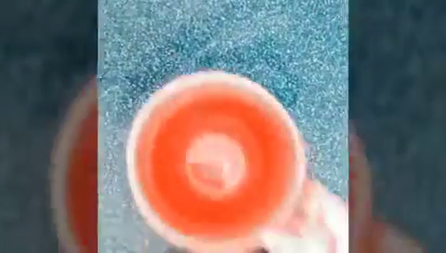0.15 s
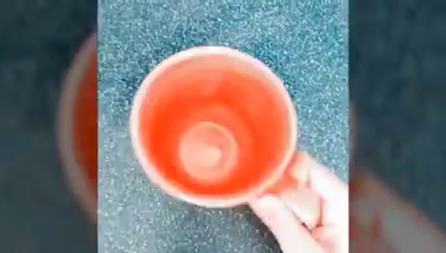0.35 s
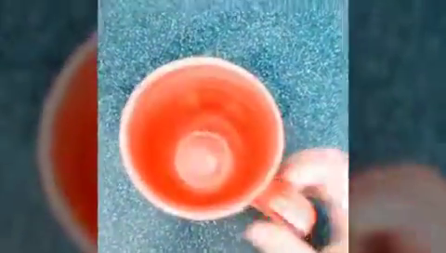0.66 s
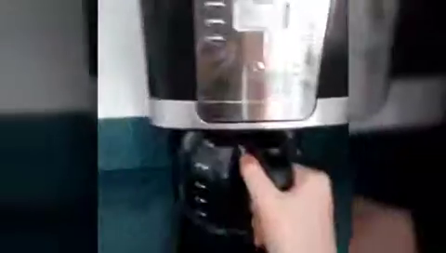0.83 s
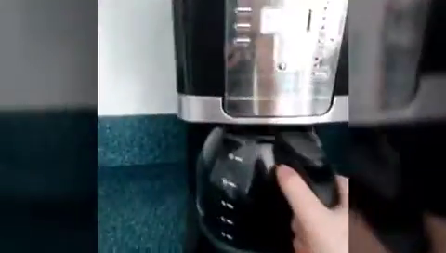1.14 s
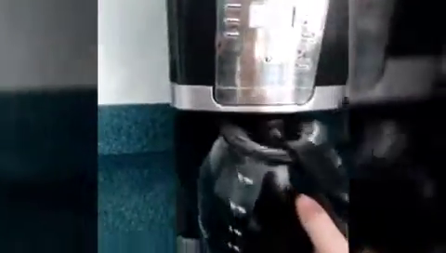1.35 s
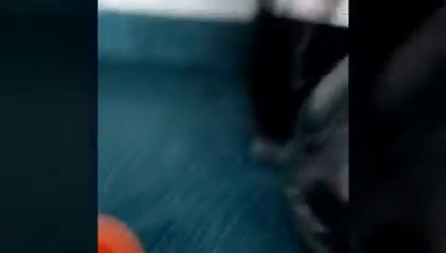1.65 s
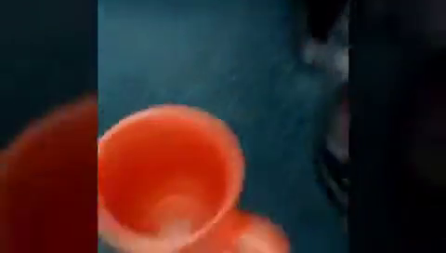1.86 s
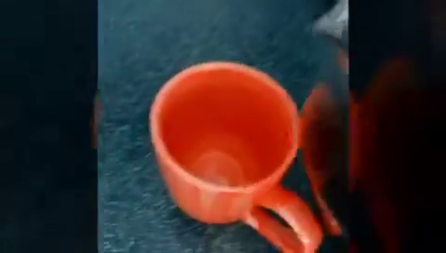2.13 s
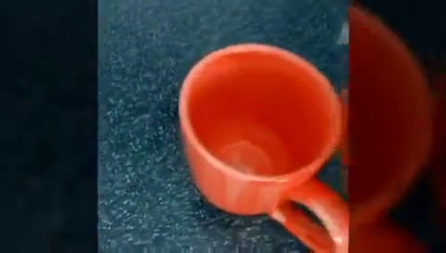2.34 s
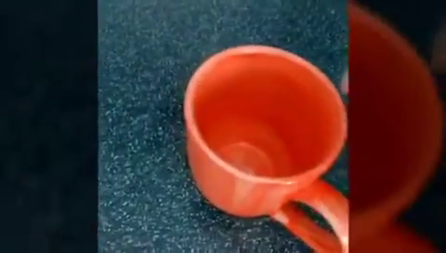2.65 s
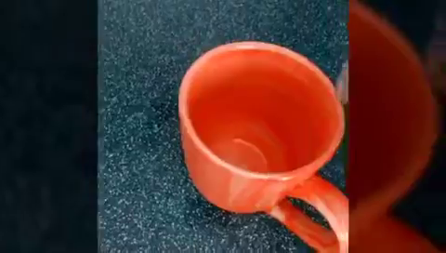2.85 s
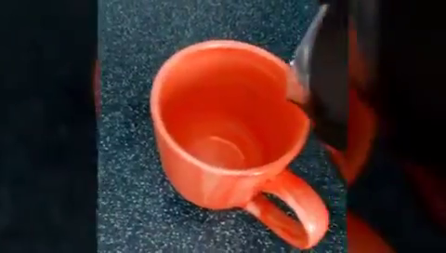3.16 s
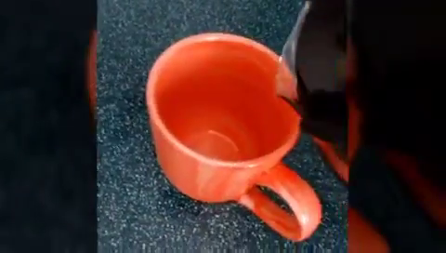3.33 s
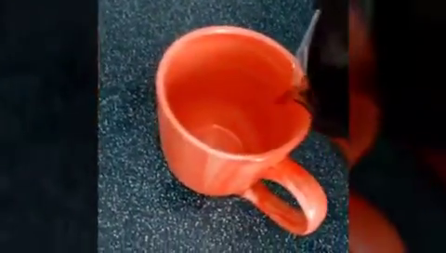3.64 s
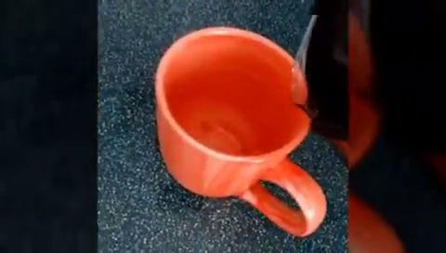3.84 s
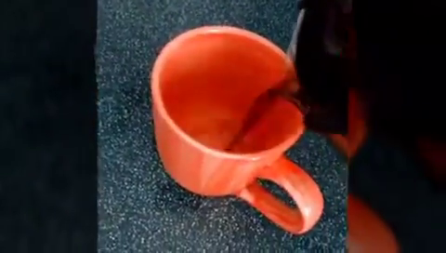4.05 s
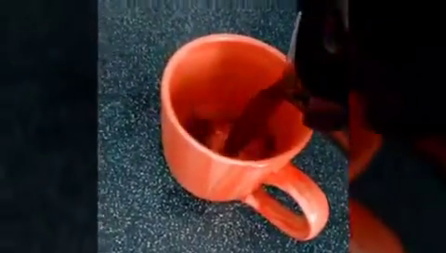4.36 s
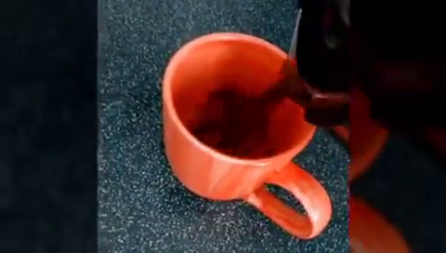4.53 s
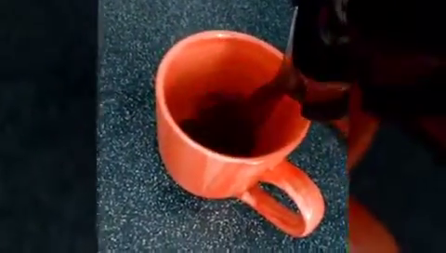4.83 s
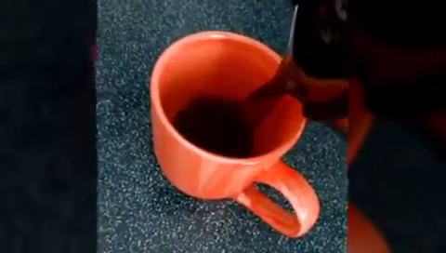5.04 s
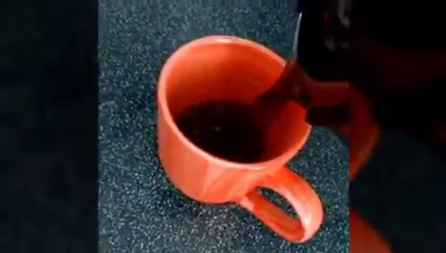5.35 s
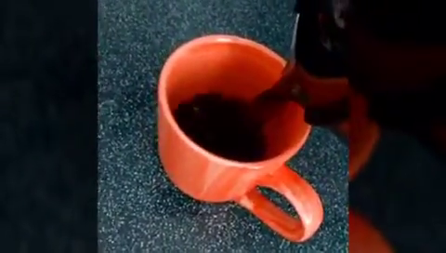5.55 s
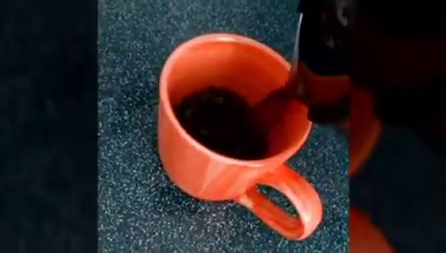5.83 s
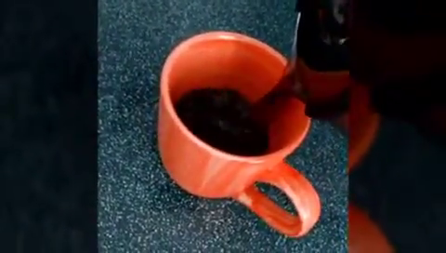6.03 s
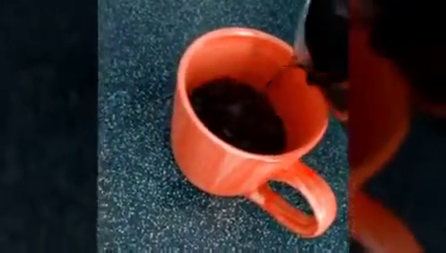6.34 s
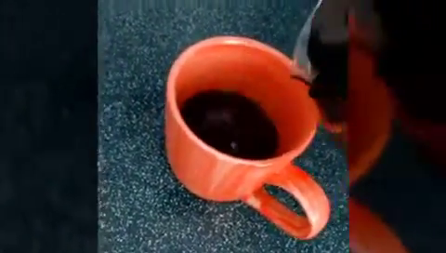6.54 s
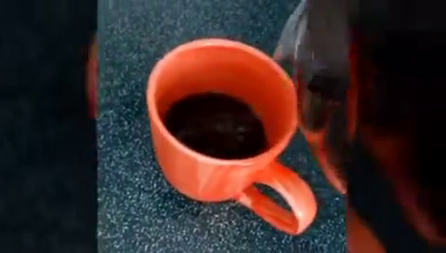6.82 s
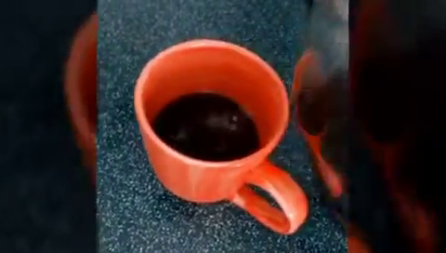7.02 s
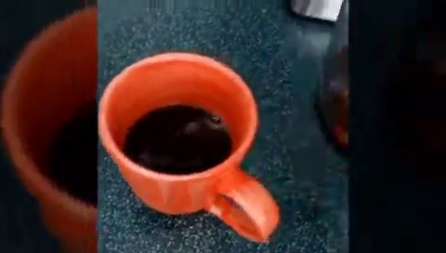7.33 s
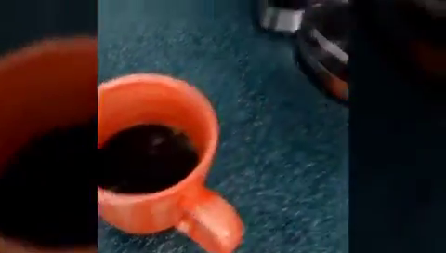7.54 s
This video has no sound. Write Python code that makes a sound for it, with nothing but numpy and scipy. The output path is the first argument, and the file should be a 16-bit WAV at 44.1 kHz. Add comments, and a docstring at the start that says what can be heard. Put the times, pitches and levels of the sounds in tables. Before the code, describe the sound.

A ceramic mug knocks hard onto a counter, a glass carafe rattles out and clinks down, then coffee trickles and bubbles into the mug.

```python
"""Over appliance rumble and hiss, a ceramic mug is set down on a counter; a glass carafe squeaks and rattles
as it is dragged out of its machine, clinks and clacks down, and touches and taps the mug with its spout.
Coffee then trickles and bubbles into the mug and the carafe lid clacks. Solid bodies sound as decaying modes
over coloured noise, rubbing as uneven partials, liquid as rising bubble tones and jolted resonances. A small
hard room returns echoes of the blows and the pour; a close phone microphone limits the band.
"""
import sys
import numpy as np
from scipy import signal
from scipy.fft import rfft, irfft
from scipy.io import wavfile
from scipy.ndimage import uniform_filter1d

SR = 44100
rng = np.random.default_rng(int(sys.argv[2]) if len(sys.argv) > 2 else 0)


def to_wav(s):
    """Save 16-bit WAV."""
    ch = np.atleast_2d(s).T  # columns
    pcm = np.round(np.clip(ch, -1, 1) * 32767)  # PCM
    wavfile.write(sys.argv[1], SR, pcm.astype(np.int16))


N = 338688  # samples


def gain_of(db):
    """Level law: decibels to amplitude ratio."""
    return 10 ** (np.asarray(db) / 20)


def evened(x):
    """Power normalization: scales a signal to rms 1."""
    return x / np.sqrt(np.mean(x ** 2) + 1e-20)


def read(points, hz):
    """Logarithmic pitch scale: interpolates (frequency [Hz], value) rows along log frequency."""
    f, value = np.transpose(points)
    return np.interp(np.log(hz + 1), np.log(f + 1), value)


def track(t, s, db):
    """Piecewise-linear level in dB over time, returned as gain; -120 dB outside the given times."""
    return gain_of(np.interp(t, s, db, -120, -120))


def add(mix, s, sound):
    """Superposition: adds a sound into the mix at a time in seconds."""
    part = mix[round(s * SR):][:len(sound)]
    part += sound[:len(part)]


def band(x, lo_hz, hi_hz):
    """Band-pass filtering: isolates one frequency range."""
    return signal.sosfilt(signal.butter(2, [lo_hz, hi_hz], "bandpass", fs=SR, output="sos"), x)


def noise(colour, count):
    """Spectral shaping: white noise weighted by a colour curve, at rms 1."""
    spectrum = rfft(rng.standard_normal(count))
    hz = np.fft.rfftfreq(count, 1 / SR)
    return evened(irfft(spectrum * gain_of(read(colour, hz)), count))


def blows(rows, modes, colour, clatter_t60, rise_ms, spread_db, chatter_db):
    """Modal impact: a blow excites decaying modes and a noise clatter; its hardness tilts the spectrum."""
    out, t = np.zeros(N), np.arange(SR) / SR
    hz, db, t60 = np.transpose(modes)[:, :, None]
    bands = ((40, 500), (500, 2500), (3500, 11000))  # thud, knock, tick [Hz]
    band_centres = (300, 1400, 5500)  # Hz
    decay = gain_of(-60 * t / clatter_t60)
    onset = np.minimum(t * 1000 / rise_ms, 1)
    for s, knock_db, thud_db, tick_db, ring_db in rows:
        uneven_db = spread_db * rng.standard_normal(hz.shape)
        rings = gain_of(db + uneven_db - 60 * t / t60) * np.sin(2 * np.pi * hz * t)
        chatter = uniform_filter1d(rng.standard_normal(rings.shape), size=600) * np.sqrt(600)
        rings *= gain_of(chatter_db * chatter)  # loose contact makes each mode swell and sag
        rings *= gain_of(ring_db) / abs(rings.sum(0)).max()
        clatter = noise(colour, len(t)) / 3
        plain = (rings.sum(0) + clatter * decay) * onset
        # tilt the colour by what each band lacks against its target level
        band_rms = [np.sqrt(uniform_filter1d(band(plain[:9000], *b) ** 2, size=300).max()) for b in bands]
        tilt_db = np.array([thud_db, knock_db, tick_db]) - 20 * np.log10(band_rms)
        tilt = list(zip(band_centres, tilt_db))
        clatter = irfft(rfft(clatter) * gain_of(read(tilt, np.arange(SR // 2 + 1))), SR)
        rings = (rings * gain_of(read(tilt, hz))).sum(0)
        add(out, s, (rings + clatter * decay) * onset)
    return out


# Appliance rumble and hiss: (frequency [Hz], level per hertz [dB])
RUMBLE_COLOUR = [(15, -40.5), (25, -23.5), (48, 2), (80, -5), (114, -5.5), (171, -10.5), (298, -11.5),
                 (374, -12.5), (560, -20.5), (797, -20.5), (952, -25.5), (1390, -28), (1750, -30.5),
                 (4340, -38), (10500, -46), (13600, -83.5), (22000, -120)]
RUMBLE_DB = -51.5  # rms level before the treble is lifted
# Spans of stronger hiss: (start [s], end [s], added treble level [dB])
HISS_SWELLS = [(0.52, 0.93, 6), (2.27, 2.835, 9.5), (3.455, 3.7, 2)]
# Hiss climbing once the coffee flows: (time [s], added treble level [dB])
HISS_CLIMB = [(4.8, -3), (6.3, 7), (7.68, 8)]


def background():
    """Stationary noise: rumble and hiss of fixed colour, the treble above 1500 Hz varying in level."""
    t, rumble = np.arange(N) / SR, noise(RUMBLE_COLOUR, N)
    treble = signal.sosfilt(signal.butter(2, 1500, "highpass", fs=SR, output="sos"), rumble)
    lift_db = np.interp(t, *np.transpose(HISS_CLIMB))
    lift_db += sum(db * (start < t) * (t < end) for start, end, db in HISS_SWELLS)
    return gain_of(RUMBLE_DB) * (rumble + (gain_of(lift_db) - 1) * treble)


# In every table of blows: knock is 500-2500 Hz, thud below 500 Hz, tick above 3500 Hz,
# and ring is the level of the modes against the clatter.
# Mug on counter: (time [s], knock [dB], thud [dB], tick [dB], ring [dB])
MUG_BLOWS = [(0.514, -5.5, -16.5, -31, -12.5), (0.728, -8.5, -17.5, -31, -12.5),
             (0.793, -12.5, -21, -38.5, -10.5)]
# Modes of the ceramic mug: (frequency [Hz], level [dB], t60 [s])
MUG_MODES = [(98.8, 5, 0.27), (186, 3, 0.19), (290.2, -0.5, 0.29), (390, -2.5, 0.3), (530, -12.5, 0.19),
             (781, -8, 0.17), (1050, -12, 0.12), (1330, -14, 0.033), (1803, -17, 0.12),
             (2403, -17.5, 0.051)]
# Unpitched clatter of the mug: (frequency [Hz], level per hertz [dB])
MUG_CLATTER = [(29, -40.5), (50, -1.5), (332, 0.5), (680, -10), (764, -6.5), (919, -14), (2480, -24),
               (10200, -73), (12500, -82.5), (16200, -118), (22000, -120)]


def mug_set_down():
    """Modal impact of a ceramic shell: low modes outlast a short clatter."""
    return blows(MUG_BLOWS, MUG_MODES, MUG_CLATTER,
                 clatter_t60=0.099, rise_ms=0.43, spread_db=3.0, chatter_db=2.5)


# Reverberation of the small hard room: (frequency [Hz], t60 [s])
ROOM_DECAY = [(100, 0.46), (500, 0.82), (2000, 0.83), (5000, 0.72), (10000, 0.49)]


def kitchen(x):
    """Sparse reflections: one tap of random sign per 20 samples, each band decaying at its own rate."""
    taps = np.zeros(SR)
    starts = np.arange(300, SR - 20, 20)
    taps[starts + rng.integers(0, 20, len(starts))] = rng.choice([-1., 1.], len(starts))
    hz, t, z = signal.stft(taps, SR, nperseg=256)
    decay = gain_of(-60 * t / read(ROOM_DECAY, hz)[:, None])
    tail = signal.istft(z * decay, SR, nperseg=256)[1]
    return signal.fftconvolve(x, tail / np.linalg.norm(tail))[:N]


# Glass rubbing on the hot plate: (time [s], length [s], level [dB])
SQUEAKS = [(0.868, 0.06, -67.5), (1.191, 0.03, -59)]
# Partials of the squeak: (frequency [Hz], level [dB])
SQUEAK_PARTIALS = [(4700, -3), (5900, -9), (6550, -7), (8600, -1)]


def squeaks():
    """Stick-slip friction: rubbing sounds a few high partials under an uneven grip."""
    out = np.zeros(N)
    for s, length, db in SQUEAKS:
        t = np.arange(0, length, 1 / SR)
        grip = 1 + .5 * evened(uniform_filter1d(rng.standard_normal(len(t)), size=200))
        tone = sum(gain_of(d) * np.sin(2 * np.pi * hz * t) for hz, d in SQUEAK_PARTIALS)
        add(out, s, gain_of(db) * grip * tone * signal.windows.tukey(len(t), .4))
    return out


# Sudden drops of the ringing and echoes: (start [s], end [s], gain [dB])
RING_DROPS = [(1.015, 1.146, -31), (2.825, 3.3, -3)]


def drop_rings(x):
    """Gated attenuation: the sounds and their echoes are abruptly weaker within each span."""
    for start, end, db in RING_DROPS:
        x[round(start * SR):round(end * SR)] *= gain_of(db)
    return x


# Carafe dragged out of the machine: (time [s], knock [dB], thud [dB], tick [dB], ring [dB])
MACHINE_BLOWS = [(1.215, -44, -40, -56, -1), (1.244, -42, -34.5, -41.5, -6),
                 (1.267, -26.5, -33.5, -45, -4.5), (1.289, -28, -25, -47.5, -27),
                 (1.314, -18.5, -21, -34.5, -5.5), (1.34, -21, -22, -29.5, -1.5),
                 (1.403, -29.5, -36.5, -49, -8.5), (1.426, -25, -36, -37, -10),
                 (1.443, -20.5, -30.5, -57, -6.5), (1.489, -35, -40.5, -50, -1.5),
                 (1.594, -27.5, -26, -37.5, -13.5), (1.614, -31.5, -23, -36.5, -5),
                 (1.7, -34, -19.5, -29.5, -8.5), (1.71, -23.5, -25, -38.5, 9)]
# Modes of the machine: (frequency [Hz], level [dB], t60 [s])
MACHINE_MODES = [(61, -8, .25), (102, -1, .23), (320, -4, .13), (705, -17, .08), (1303, -15, .09),
                 (1550, -24, .25), (1938, -21, .2), (2078, -17, .14), (2492, -25, .15), (2606, -19, .2),
                 (3138, -32, .2), (3822, -33, .15), (3984, -25, .3), (4700, -30, .1), (5900, -32, .08),
                 (6400, -29, .1)]
# Unpitched clatter of the machine: (frequency [Hz], level per hertz [dB])
MACHINE_CLATTER = [(29, -38.5), (50, -7), (102, -9), (162, -14.5), (325, 5.5), (429, -9.5), (1800, -27),
                   (2060, -22), (8250, -35), (12500, -43), (16200, -54), (22000, -120)]


def machine_rattle():
    """Repeated modal impact: a run of blows excites the modes of the machine, with strong chatter."""
    return blows(MACHINE_BLOWS, MACHINE_MODES, MACHINE_CLATTER,
                 clatter_t60=0.12, rise_ms=0.73, spread_db=3.5, chatter_db=5.5)


# Carafe clinking down: (time [s], knock [dB], thud [dB], tick [dB], ring [dB])
GLASS_BLOWS = [(2.314, -8.5, -14.5, -12.5, 2.5), (2.412, -19, -17.5, -17.5, -4.5)]
# Modes of the glass carafe: (frequency [Hz], level [dB], t60 [s])
GLASS_MODES = [(162, -19, .25), (226, -14, .17), (322, -9, .12), (748, -13, .1), (969, -20, .2),
               (1488, 0, .2), (1550, -11, .3), (1997, -7, .55), (2142, -10, .45), (2317, -2, .27),
               (2477, -6, .14), (2861, -13, .45), (3500, -18, .25), (3826, -10, .33), (4385, -10, .2),
               (4870, -4, .14), (5893, -6, .11), (6030, -21, .45), (6514, -22, .18), (6700, -19, .12),
               (7300, -10, .05), (8495, -7, .1), (9190, -20, .1), (9990, -22, .1)]
# Unpitched clatter of the glass: (frequency [Hz], level per hertz [dB])
GLASS_CLATTER = [(40, -23), (310, -10), (1100, -13.5), (2300, -9.5), (4200, -22), (6500, -12), (7900, -28),
                 (9500, -19), (12500, -40.5), (16000, -72)]


def glass_clinks():
    """Modal impact of a glass shell: many bright modes, strongest in the kilohertz range."""
    return blows(GLASS_BLOWS, GLASS_MODES, GLASS_CLATTER,
                 clatter_t60=0.11, rise_ms=1.0, spread_db=0.85, chatter_db=4.0)


# Dull clacks of the carafe and its lid: the carafe body set down, later the lid:
# (time [s], knock [dB], thud [dB], tick [dB], ring [dB])
CLACK_BLOWS = [(2.48, -24, -15.5, -34.5, 0.5), (6.657, -15.5, -16, -21, 0.5), (6.742, -37, -68, -45, -3),
               (6.905, -45.5, -36.5, -58, 1), (7.03, -34.5, -29.5, -55.5, 1)]
# Modes of the clacks: (frequency [Hz], level [dB], t60 [s])
CLACK_MODES = [(96, -20, .18), (160, -22, .12), (220, -13, .1), (323, 0, .11), (1120, -12, .045),
               (1580, -14, .055), (1900, -22, .05), (2100, -19, .09), (2370, -18, .07), (3170, -26, .05),
               (3314, -24, .045), (3690, -17, .05), (5600, -30, .03)]
# Unpitched clatter of the clacks: (frequency [Hz], level per hertz [dB])
CLACK_CLATTER = [(40, -20), (100, -7), (320, 4), (560, -20.5), (900, -10), (2300, -17), (4200, -29),
                 (9500, -27.5), (12500, -82), (16000, -93)]


def carafe_and_lid_clacks():
    """Heavily damped modal impact: short modes make a dull clack of the carafe body, later of the lid."""
    return blows(CLACK_BLOWS, CLACK_MODES, CLACK_CLATTER,
                 clatter_t60=0.064, rise_ms=1.24, spread_db=-2.5, chatter_db=3.0)


# Spout meeting the mug: (time [s], knock [dB], thud [dB], tick [dB], ring [dB])
RIM_TOUCH = [(3.457, -58, -74, -63.5, 6.4)]
# Modes of that touch: (frequency [Hz], level [dB], t60 [s])
RIM_MODES = [(1550, 7, 0.63), (4570, -11, 0.18), (6169, -16, .2)]


def rim_touch():
    """Lightly damped modal impact: a soft touch leaves one long mode ringing above two weaker ones."""
    return blows(RIM_TOUCH, RIM_MODES, GLASS_CLATTER,
                 clatter_t60=.15, rise_ms=3, spread_db=.6, chatter_db=4)


# Spout knocking the mug: (time [s], knock [dB], thud [dB], tick [dB], ring [dB])
SPOUT_TAPS = [(3.721, -33, -27.5, -47.5, 6.6), (4.327, -47, -67, -62, 3.3)]
# Modes of those knocks: (frequency [Hz], level [dB], t60 [s])
SPOUT_MODES = [(320, 0, .09), (880, -20, .04), (1290, -29, .07), (1900, -18, .06), (2350, -11, .055),
               (3700, -20, .04), (5600, -28, .05), (6050, -30, .05)]


def spout_taps():
    """Damped modal impact with a slow onset: the spout taps the mug with short modes."""
    return blows(SPOUT_TAPS, SPOUT_MODES, CLACK_CLATTER,
                 clatter_t60=0.082, rise_ms=3.4, spread_db=-2.4, chatter_db=5.0)


def bubble(hz, cycles, rise):
    """Bubble resonance: a pocket of air rings briefly, its pitch climbing as it nears the surface."""
    turns = np.arange(0, 4 * cycles, hz / SR)  # periods of the starting pitch
    swell = np.exp(-2 * turns / cycles) * np.minimum(turns / 2.5, 1)
    return np.sin(2 * np.pi * turns * (1 + rise * turns / cycles)) * swell


def clusters(rows, cycles, rise, scatter, spread_s, count=4):
    """Air entrainment: each plunge frees one main bubble, then a few weaker ones of nearby size."""
    out = np.zeros(N)
    for (s, db, hz), chance in zip(rows, rng.random((len(rows), count, 3))):
        add(out, s, gain_of(db) * bubble(hz, cycles, rise))
        for late, size, weak in chance:
            near_hz = hz * np.exp(scatter * (2 * size - 1))
            add(out, s + spread_s * late, gain_of(db - 4.0 - 6.8 * weak) * bubble(near_hz, cycles, rise))
    return out


def swarm(lo_hz, hi_hz, per_s, cycles, spread_db, clump_db, count=24):
    """Random superposition: bubbles of many sizes arrive in clumps, a few much louder; rms 1."""
    clumps = gain_of(clump_db * evened(uniform_filter1d(rng.standard_normal(N), size=500)))
    loudness = gain_of(spread_db * np.minimum(rng.exponential(1, N), 4))
    hits = loudness * (rng.random(N) < clumps * per_s / SR)
    kind = rng.integers(0, count, N)
    total = np.zeros(N)
    for k, hz in enumerate(np.geomspace(lo_hz, hi_hz, count)):
        total += signal.oaconvolve(hits * (kind == k), bubble(hz, cycles, 0.045))[:N]
    return evened(total)


def jolted(rows, width_hz, jolts_per_s):
    """Driven resonance: a resonator of moving pitch rings at each of many random jolts."""
    s, hz, db = np.transpose(rows)
    t = np.arange(N) / SR
    turn = np.exp(2j * np.pi * np.cumsum(np.interp(t, s, hz)) / SR)
    r = np.exp(-np.pi * width_hz / SR)  # decay per sample
    strength = gain_of(4.1 * np.minimum(rng.exponential(1, N), 4))
    jolts = strength * (rng.random(N) < jolts_per_s / SR)
    ring = (turn * signal.lfilter([1], [1, -r], jolts / turn + 1e-18)).real
    return track(t, s, db) * evened(ring)


# The stream of coffee: (time [s], gurgle level [dB], fizz level [dB])
STREAM = [(4.45, -91, -70), (4.56, -63.5, -62), (4.74, -78.5, -90), (4.76, -48, -52.5), (4.92, -66, -54.5),
          (5.0, -53.5, -55), (5.12, -51, -52.5), (5.17, -59, -75), (5.3, -54.5, -54.5),
          (5.39, -63.5, -66.5), (5.49, -54.5, -62.5), (5.7, -58, -62.5), (6.2, -66, -62), (6.3, -63.5, -80),
          (6.6, -73, -64)]
# Large bubbles: (time [s], level [dB], starting pitch [Hz])
BUBBLES = [(4.482, -46, 4370), (4.534, -43.5, 2480), (4.573, -35, 2760), (4.758, -38, 1024),
           (4.798, -24, 2400), (4.856, -32, 3720), (4.949, -32, 2980), (4.987, -30, 1210),
           (4.997, -27, 1653), (5.128, -30.5, 1450), (5.172, -39, 3940), (5.201, -36, 1780),
           (5.222, -39, 1260), (5.278, -30, 2800), (5.331, -38, 2700), (5.421, -39, 2680),
           (5.48, -29.5, 4130), (5.487, -35, 1300), (5.499, -25, 3080), (5.534, -28.5, 3630),
           (5.655, -39, 954), (5.688, -36.5, 923), (5.78, -25.5, 3980), (5.78, -33.5, 994),
           (5.873, -35.5, 2970), (6.192, -39, 4140), (6.63, -36, 3070), (6.863, -42, 2920)]
# Small bright droplets: (time [s], level [dB], starting pitch [Hz])
DROPLETS = [(4.4825, -36.5, 4500), (4.6227, -44, 6950), (4.7843, -30.5, 6340), (4.8387, -30, 7040),
            (4.8568, -30, 8440), (4.8689, -23, 6800), (4.947, -40, 5750), (4.9687, -34, 6350),
            (4.9901, -22, 8700), (5.027, -45, 5560), (5.0732, -25.5, 8860), (5.246, -33.5, 6550),
            (5.277, -39, 8700), (5.3284, -37, 7800), (5.462, -39, 5700), (5.685, -25, 8500),
            (5.7324, -36, 5900), (5.7604, -28.5, 6400), (6.0785, -38.5, 7000), (6.196, -32, 6200),
            (6.6149, -42, 5030), (6.769, -31, 5900), (6.79, -17.5, 6120), (6.8159, -22, 6500)]
# A higher resonance heard while the coffee pours: (time [s], frequency [Hz], level [dB])
UPPER_RESONANCE = [(4.76, 2550, -66), (5.0, 2690, -59), (5.5, 2620, -66), (5.9, 2730, -63),
                   (6.5, 2860, -71)]
# Resonance of the air above the coffee: (time [s], frequency [Hz], level [dB])
MUG_AIR = [(5.35, 1110, -88), (5.5, 985, -56.5), (5.85, 955, -60.5), (6.2, 1080, -66)]
# A resonance between the two: (time [s], frequency [Hz], level [dB])
MIDDLE_RESONANCE = [(5.5, 1850, -72), (5.68, 1850, -56.5), (5.9, 1810, -69)]


def pour():
    """Bubble acoustics: single bubbles and droplets over gurgle and fizz, with three moving resonances."""
    t = np.arange(N) / SR
    out = clusters(BUBBLES, cycles=11.3, rise=0.012, scatter=.16, spread_s=0.017)
    out += clusters(DROPLETS, cycles=10.4, rise=0.0078, scatter=0.35, spread_s=0.0026)
    s, gurgle_db, fizz_db = np.transpose(STREAM)
    gurgle = swarm(1900, 4900, per_s=800, cycles=16, spread_db=4.5, clump_db=5)
    gurgle += gain_of(-5) * swarm(1000, 2100, per_s=250, cycles=14, spread_db=4.5, clump_db=5)
    fizz = swarm(4300, 9800, per_s=900, cycles=6, spread_db=3.5, clump_db=7)
    out += track(t, s, gurgle_db) * gurgle + track(t, s, fizz_db) * fizz
    out += jolted(MUG_AIR, width_hz=60, jolts_per_s=80)
    out += jolted(UPPER_RESONANCE, width_hz=90, jolts_per_s=70)
    return out + jolted(MIDDLE_RESONANCE, width_hz=90, jolts_per_s=100)


def scene():
    """Superposition of direct sounds, their room echoes and the background."""
    mug = mug_set_down()
    machine = squeaks() + machine_rattle()
    glass = glass_clinks()
    clacks_and_spout = carafe_and_lid_clacks() + rim_touch() + spout_taps()
    coffee = pour()
    # each source excites the room at its own level
    sent = gain_of(-15.5) * mug + gain_of(-17.5) * machine + gain_of(-17) * glass
    sent += gain_of(-18.5) * clacks_and_spout + gain_of(-18) * coffee
    near = mug + machine + glass + clacks_and_spout + coffee + kitchen(sent)
    return (drop_rings(near) + background())[None]


CEILING = .85  # amplitude limit of the soft clipping
TOP_HZ, TOP_DB = 10270, -16  # the microphone path drops by this much above this frequency
EDGE_HZ = 12600  # band limit


def record(dry):
    """Transducer response: low cut, soft clipping of the hardest blows, high shelf, then band limit."""
    cut = signal.sosfilt(signal.butter(3, 44, "highpass", fs=SR, output="sos"), dry)
    squeezed = CEILING * np.tanh(cut / CEILING)
    under = signal.oaconvolve(squeezed, signal.firwin(255, TOP_HZ, fs=SR)[None], "same")
    shelved = under + gain_of(TOP_DB) * (squeezed - under)
    edge = signal.firwin(511, EDGE_HZ, window=("kaiser", 9), fs=SR)
    return signal.oaconvolve(shelved, edge[None], "same")


dry = scene()
out = record(dry)
to_wav(out)
```